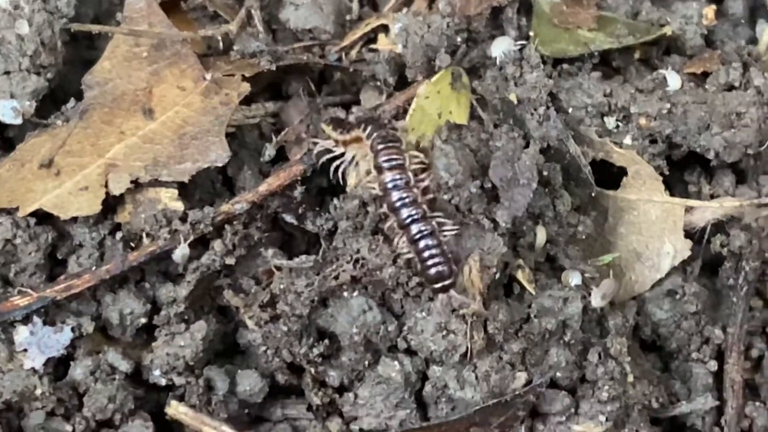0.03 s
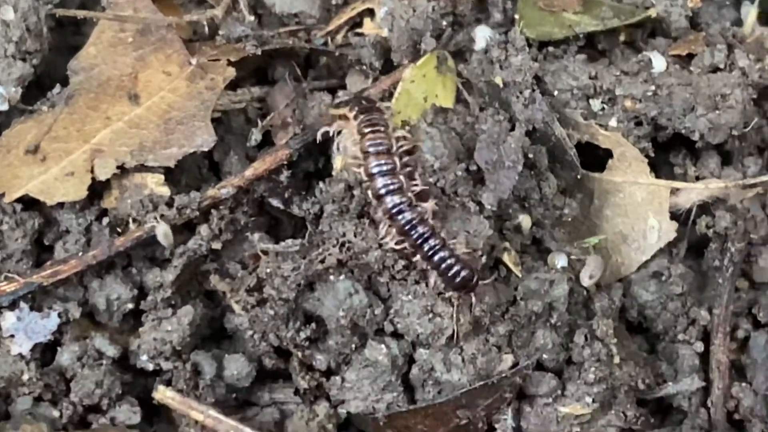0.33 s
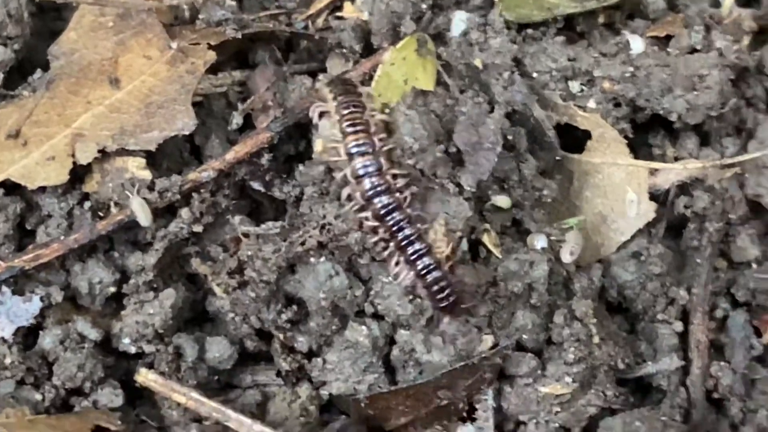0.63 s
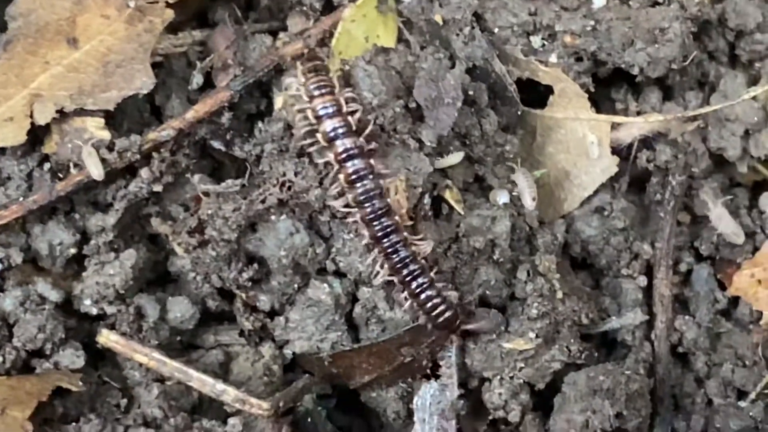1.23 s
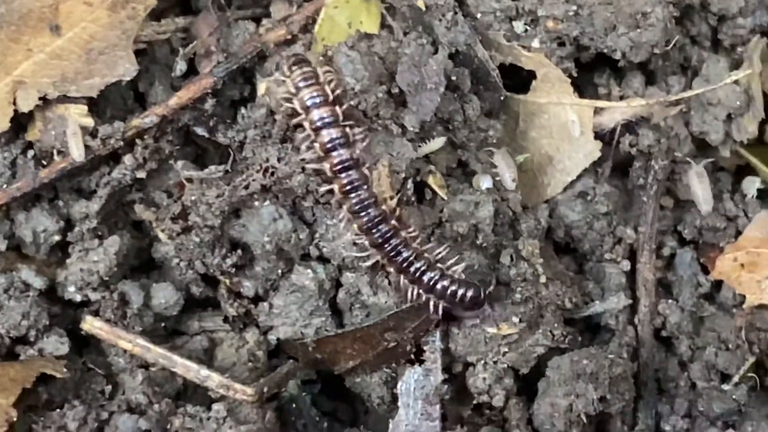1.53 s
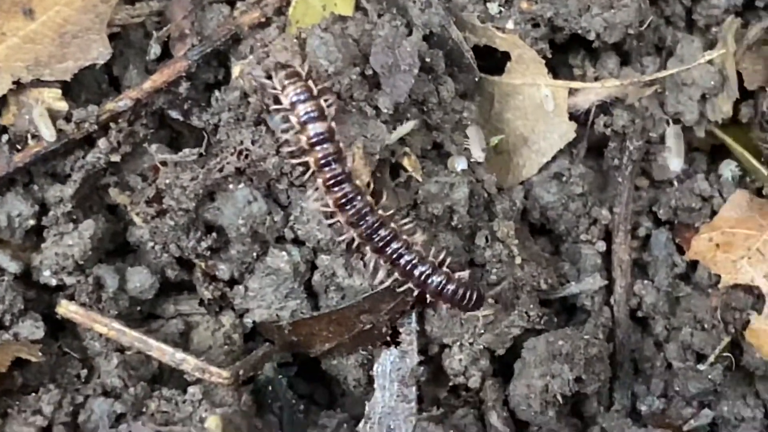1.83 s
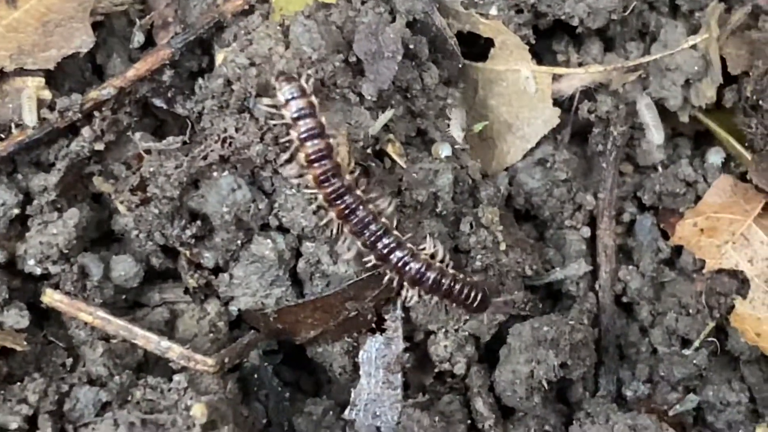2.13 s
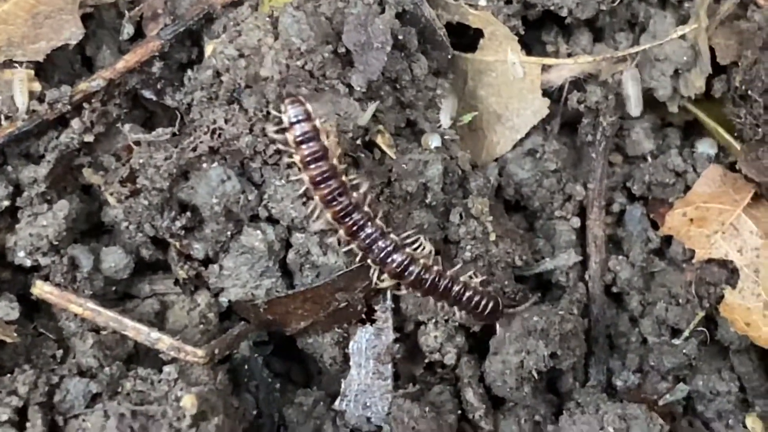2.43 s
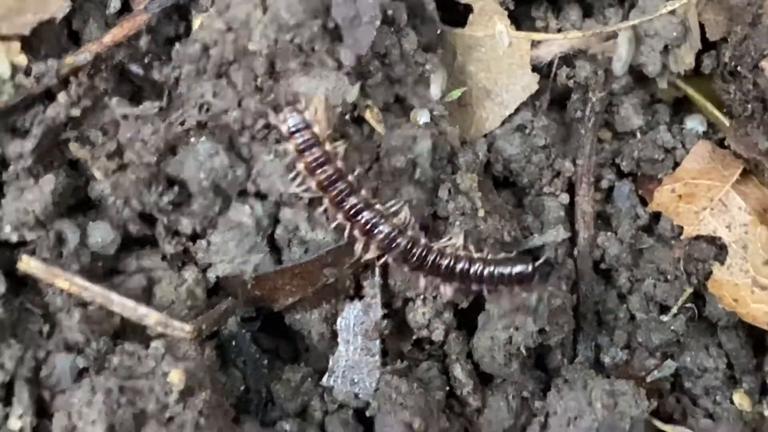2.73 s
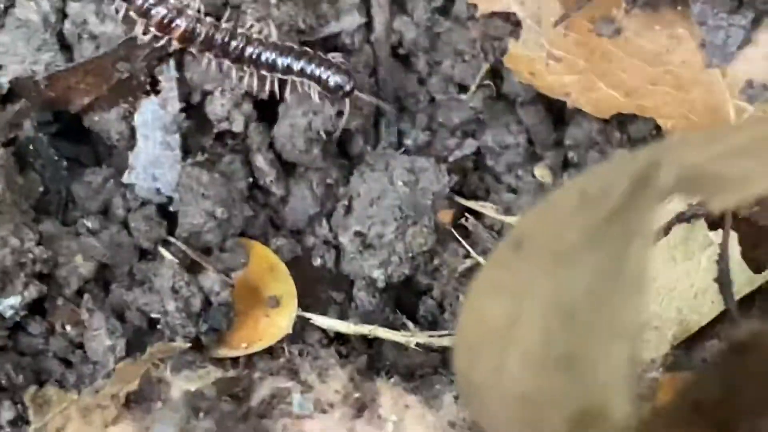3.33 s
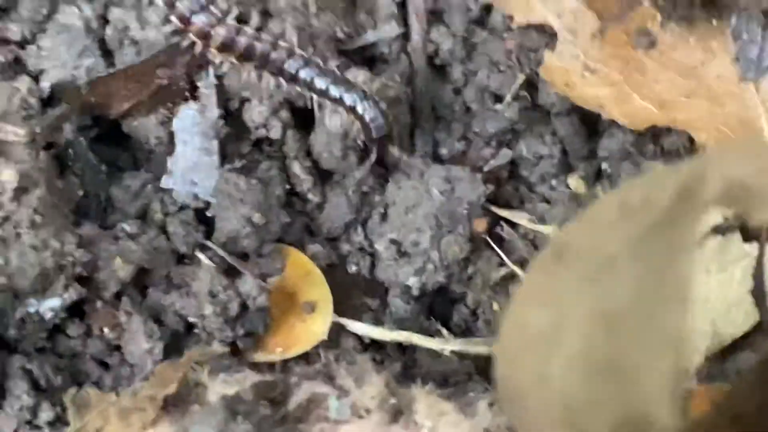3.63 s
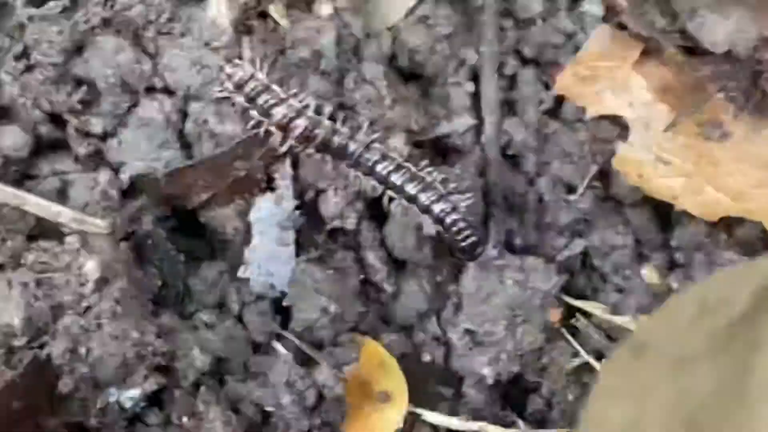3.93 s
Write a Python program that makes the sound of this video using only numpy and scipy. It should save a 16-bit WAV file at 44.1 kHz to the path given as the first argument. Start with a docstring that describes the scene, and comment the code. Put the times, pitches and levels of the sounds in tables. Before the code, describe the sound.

Dry leaves rustle and snap, with a knock and scuffs on the microphone outdoors.

```python
"""A low rumble and faint outdoor air come first, as a hand holds a camera over soil in a quiet spot.
Dry leaves tick as they fracture, and a few far-off thuds die away in short resonant tails.
Then the camera moves: leaves slide and snap, and a hard knock by the right microphone rings the case.
The shifting grip scuffs the case by friction, bumps it softly and slips with a faint squeak."""
import sys
import numpy as np
from scipy import signal
from scipy.fft import rfft, irfft, next_fast_len
from scipy.io import wavfile

SR = 44100
rng = np.random.default_rng(int(sys.argv[2]) if len(sys.argv) > 2 else 0)


def log_audio(samples):
    """Write samples as a 16-bit WAV file to the path given in sys.argv[1]."""
    # one column per channel
    frames = np.atleast_2d(samples).T
    # limit to full scale, then quantise
    limited = np.clip(frames, -1, 1)
    pcm = np.round(limited * 32767).astype(np.int16)
    wavfile.write(sys.argv[1], SR, pcm)


N = 176400
CUTOFF_HZ = 15750


def from_db(db):
    return 10 ** (np.asarray(db) / 20)


def unit_rms(x):
    return x / np.sqrt(np.mean(x ** 2) + 1e-20)


def since(onset):
    return np.maximum(np.arange(N) / SR - onset, 0)


def decay(t, t60):
    """Damping: amplitude falls exponentially, by 60 dB in t60 seconds."""
    return np.exp(-np.minimum(np.log(1000) * t / t60, 60))


def level_curve(points):
    return from_db(np.interp(since(0), *np.transpose(points)))


def at_hz(points, hz):
    frequencies, levels = np.transpose(points)
    return np.interp(np.log(hz), np.log(frequencies), levels)


def band(x, low, high):
    sos = signal.butter(2, [low, min(high, .48 * SR)], "band", fs=SR, output="sos")
    return signal.sosfilt(sos, x + 1e-18)


def drift(corner_hz, step=40):
    """Random modulation: low-passed noise wanders with unit rms."""
    pole = np.exp(-2 * np.pi * corner_hz * step / SR)
    noise = rng.standard_normal(N // step + 2002)
    slow = signal.lfilter([1], [1, -2 * pole, pole * pole], noise)[2000:]
    return np.interp(np.arange(N) / step, np.arange(len(slow)), unit_rms(slow))


def stereo(mid, side):
    return np.array([mid + side, mid - side])


def hiss():
    """Incoherent sources: two independent mid and side pairs of white noise."""
    return rng.standard_normal((2, 2, N))


def grains(per_s, spread_db, power_decay_s=0.00015):
    """Shot noise: tiny fractures of uneven size arrive at random, each a brief burst."""
    sizes = from_db(spread_db * np.minimum(rng.exponential(1, N), 4.5))
    fractures = sizes * (rng.random(N) < per_s / SR)
    power = signal.lfilter([1], [1, -np.exp(-1 / (power_decay_s * SR))], fractures ** 2 + 1e-18)
    return unit_rms(np.sqrt(power) * hiss())


# Stereo width at the two microphone ports: (frequency [Hz], side minus mid [dB])
STEREO_WIDTH = [(60, -25), (130, -12.5), (250, -8), (480, -3.5), (950, -3.5), (1600, 0.5), (2300, -9),
                (3500, -51.5), (8000, -25.5)]


def coloured(source, spectrum, flicker_db, flicker_hz):
    """Spectral shaping: third-octave bands, each with its own level, width and flicker, sum to rms 1."""
    out, edges = 0, 20 * 2 ** (np.arange(30) / 3)
    for k, (low, high) in enumerate(zip(edges, edges[1:])):
        hz = np.sqrt(low * high)
        flicker = flicker_db * drift(flicker_hz)
        if spectrum[0][0] <= hz <= spectrum[-1][0]:
            mid, side = band(source[k % 2], low, high)
            width = from_db(at_hz(STEREO_WIDTH, hz))
            out += from_db(at_hz(spectrum, hz) + flicker) * stereo(mid, side * width)
    return unit_rms(out)


# Spectrum of the hand's rumble: (frequency [Hz], relative density [dB])
RUMBLE_SPECTRUM = [(20, -6), (33, -16), (52, 2), (68, -2.5), (90, -7), (130, -12.5), (190, -24),
                   (300, -35.5), (600, -33.5)]
# Its envelope: (time [s], level [dB])
RUMBLE_ENVELOPE = [(0, -41.5), (.3, -47), (.7, -41.5), (1.0, -46), (1.35, -45), (1.85, -45), (2.1, -47),
                   (2.45, -47), (2.63, -42), (3.0, -45), (3.42, -41), (3.6, -46.5), (3.8, -39), (4, -40)]


def hand_rumble():
    """Structure-borne sound: the case conducts the low vibration of the holding hand."""
    rumble = coloured(hiss(), RUMBLE_SPECTRUM, flicker_db=2.0, flicker_hz=32)
    return level_curve(RUMBLE_ENVELOPE) * rumble


# Spectrum of the outdoor air: (frequency [Hz], relative density [dB])
AIR_SPECTRUM = [(100, 0), (230, 3), (290, -3), (400, -5), (540, -21.5), (660, -17), (1000, -15),
                (1450, -27), (1900, -22.5), (2400, -30), (3000, -27.5), (4700, -32.5), (7500, -35),
                (11000, -35), (14700, -54)]
# Faint narrow bands in it: (centre [Hz], level [dB], edge over centre [ratio])
AIR_PEAKS = [(503, -75.5, 1.04), (3084, -80, 1.126)]


def outdoor_air(level_db=-58):
    """Ambient noise: a steady broadband floor carries two faint narrow bands."""
    air = from_db(level_db) * coloured(hiss(), AIR_SPECTRUM, flicker_db=1.34, flicker_hz=6.3)
    for hz, db, span in AIR_PEAKS:
        air += from_db(db) * unit_rms(band(rng.standard_normal(N), hz / span, hz * span))
    return air


# Fractures of dry leaves: (time [s], relative level [dB], extra gain of the body [dB])
LEAF_FRACTURES = [(0.109, -40, 0), (0.6062, -29.5, -3.5), (0.8407, -41.5, 1), (1.4644, -39.5, -18),
                  (2.3313, -41.5, 10), (2.934, -22.5, -1.5), (3.011, -14.5, -5), (3.025, -25, 2),
                  (3.046, -11, -7.5), (3.0978, -15, -9), (3.111, -26.5, 10), (3.173, -24, 13),
                  (3.311, -22, -26), (3.3498, -22, -18), (3.4, -20.5, -14), (3.4527, -28, 0),
                  (3.667, -24.5, 1), (3.6985, -28, -5), (3.8493, -18.5, -5), (3.8712, -38, 21.5),
                  (3.889, -35, 12.5)]


def leaf_snaps(rise_s=0.001, t60=0.0079, edge_hz=7300, body_hz=2310, edge_db=-7, body_db=-8):
    """Brittle fracture: each break releases a noise burst with a bright edge and a papery body."""
    edge_envelope = body_envelope = 0
    for onset, db, extra_db in LEAF_FRACTURES:
        t = since(onset)
        burst = from_db(db) * (1 - np.exp(-t / rise_s)) * decay(t, t60)
        edge_envelope += burst
        body_envelope += burst * from_db(extra_db)
    edge_noise, body_noise = hiss()[0]
    edge = band(edge_envelope * edge_noise, edge_hz, CUTOFF_HZ)
    body = band(body_envelope * body_noise, body_hz / 2, body_hz * 2)
    return from_db(edge_db) * edge + from_db(body_db) * body


# Distant knocks: (time [s], level [dB])
FAR_KNOCKS = [(0.61, -55), (0.659, -68), (.75, -72), (1.725, -54)]
# Their shared resonances: (centre [Hz], gain [dB], edge over centre [ratio], t60 [s])
THUD_RESONANCES = [(526, -1, 1.102, 0.69), (914, -4, 1.26, 0.4)]


def far_thuds(rise_s=0.0048, side_db=-4):
    """Reverberant decay: distant knocks smear into short tails; the lower resonance lasts longer."""
    out = 0
    for hz, band_db, span, t60 in THUD_RESONANCES:
        tails = 0
        for onset, db in FAR_KNOCKS:
            t = since(onset)
            tails += from_db(db) * (1 - np.exp(-t / rise_s)) * decay(t, t60)
        mid, side = unit_rms(band(hiss()[0], hz / span, hz * span))
        out += from_db(band_db) * tails * stereo(mid, side * from_db(side_db))
    return out


# Spectrum of leaves sliding on each other: (frequency [Hz], relative density [dB])
RUSTLE_SPECTRUM = [(150, 12.5), (400, 10), (900, 7), (1600, -0.5), (2300, 3.5), (3200, 5), (4700, -0.5),
                   (7200, 4), (11000, 6), (16000, 3.5)]
# Vigour of the sliding: (time [s], level [dB])
RUSTLE_ENVELOPE = [(2.5, -90), (2.65, -74.5), (2.82, -60.5), (2.96, -55), (3.02, -45), (3.11, -48),
                   (3.21, -49), (3.29, -58.5), (3.39, -55), (3.44, -63), (3.52, -53), (3.58, -67.5),
                   (3.73, -64), (3.86, -63), (3.92, -62.5), (3.98, -60.5)]


def leaf_rustle(surge_db=2.5):
    """Sliding friction: dry leaves hiss and crackle against each other in small surges."""
    slide = from_db(-3) * hiss()
    crackle = from_db(-4.5) * grains(per_s=1000, spread_db=3)
    leaves = coloured(slide + crackle, RUSTLE_SPECTRUM, flicker_db=2.9, flicker_hz=31)
    surges = from_db(surge_db * drift(corner_hz=21))
    return level_curve(RUSTLE_ENVELOPE) * surges * leaves


# Strokes of the grip on the case: (time [s], duration [s], rub level [dB], rasp level [dB])
GRIP_STROKES = [(2.974, 0.0035, -43.5, -51), (3.008, 0.0033, -43, -46.5), (3.024, 0.005, -43, -51),
                (3.465, 0.0041, -44.5, -58), (3.495, .005, -53, -75), (3.753, 0.0044, -46, -46.5),
                (3.763, 0.014, -43, -49), (3.787, 0.0037, -47, -45), (3.794, 0.016, -45.5, -64),
                (3.818, 0.041, -61, -58), (3.847, 0.028, -58, -54), (3.949, 0.013, -57, -50),
                (3.963, 0.03, -51, -58.5)]
# Spectra of the dull rub and the papery rasp: (frequency [Hz], relative density [dB])
RUB_SPECTRUM = [(130, -3), (220, -3), (320, -0.5), (480, 7.5), (660, -8), (880, 0), (1400, -29),
                (2000, -36)]
RASP_SPECTRUM = [(700, 1), (1200, -1), (2100, 1.5), (2800, -2.5), (3800, -15.5), (8000, -13.5),
                 (14000, -42)]


def grip_scuffs(rise_s=0.0041, release_t60=0.032):
    """Friction noise: a dull rub and a fine rasp follow the contact pressure of each stroke."""
    rub_envelope = rasp_envelope = 0
    for onset, duration, rub_db, rasp_db in GRIP_STROKES:
        pressure = (1 - np.exp(-since(onset) / rise_s)) * decay(since(onset + duration), release_t60)
        rub_envelope += from_db(rub_db) * pressure
        rasp_envelope += from_db(rasp_db) * pressure
    grit = grains(per_s=13000, spread_db=4.5)
    rub = coloured(hiss(), RUB_SPECTRUM, flicker_db=1.0, flicker_hz=31)
    rasp = coloured(grit, RASP_SPECTRUM, flicker_db=2.0, flicker_hz=63)
    return rub_envelope * rub + rasp_envelope * rasp


# Modes of the case: (frequency [Hz], gain [dB], t60 [s], multiplier of the blow's pan [ratio])
CASE_MODES = [(61.3, -29, 0.23, 0.11), (149, -7, 0.058, 2.9), (186.5, -12.5, 0.034, 0),
              (256, -4, 0.021, 3.6), (372.5, -18, 0.033, 0.21), (619, -31, 0.066, 0.21),
              (788, -11, 0.035, 0.61), (908, -3.5, 0.013, 0.98), (1220, -13, 0.014, 2.2),
              (1374, -12.5, 0.024, 1.55), (1660, -24, 0.015, 0.81), (2110, -26.5, 0.015, 0.18),
              (3190, -28, 0.0095, 0.1), (6250, -29.5, 0.007, 0.1)]
# Blows on it: (time [s], relative level [dB], low-pass corner [Hz], rightward pan [dB])
CASE_BLOWS = [(3.124, -19.5, 586, 9), (3.172, 4, 9050, 7.5), (3.194, -1.5, 97, 1),
              (3.469, -24.5, 470, -1.5), (3.477, 3.5, 61.6, 0), (3.5, -15, 170, 1.5), (3.767, -9, 239, 2.5),
              (3.771, 1, 52, 2), (3.784, -12.5, 100, -3), (3.796, -13.5, 260, 3), (3.934, -8, 49.8, 0.5),
              (3.966, -12.5, 283, 1.5)]


def case_blows(build_cycles=0.47, max_lag_s=0.00048):
    """Modal ringing: blows excite damped modes; low ones build last, soft contacts lose the highs."""
    out, size = np.zeros((2, N + SR)), SR // 3
    t = np.arange(size) / SR
    left_only = np.array([[1], [0]])
    for onset, db, corner_hz, pan_db in CASE_BLOWS:
        start = int(onset * SR)
        for k, (hz, mode_db, t60, pan_scale) in enumerate(CASE_MODES):
            # A blow on the right reaches the left port later and weaker.
            lag = max_lag_s * np.tanh(pan_db / 6) * (pan_scale > .1)
            age = np.maximum(t - lag * left_only, 0)
            gain = from_db(db + mode_db - pan_db * pan_scale * left_only) / (1 + (hz / corner_hz) ** 2)
            build = 1 - np.exp(-(age * hz / build_cycles) ** 2)
            ring = decay(age, t60) * np.sin(2 * np.pi * hz * age)
            out[:, start:start + size] += (-1) ** k * gain * build * ring
    return out[:, :N]


def grip_squeak(peak_s=3.585, swell_s=0.097, hz=2280, half_width_hz=70, level_db=-69):
    """Narrow-band friction noise: a thin note swells and fades as the grip slips."""
    swell = np.exp(-((since(0) - peak_s) / swell_s) ** 2)
    note = unit_rms(band(rng.standard_normal(N), hz - half_width_hz, hz + half_width_hz))
    return from_db(level_db) * swell * note


def scene():
    """Superposition: the pressures of all the sources add."""
    return (hand_rumble() + outdoor_air() + leaf_snaps() + far_thuds()
            + leaf_rustle() + grip_scuffs() + case_blows() + grip_squeak())


# Treble roll-off of both microphones: (frequency [Hz], gain [dB])
MIC_ROLLOFF = [(11500, 0.5), (13000, -6.5), (14200, -10.5), (16000, -17)]
# Phase lag of the right microphone: (frequency [Hz], lag [cycles])
RIGHT_PHASE_LAG = [(7400, 0), (9050, .5), (11200, 1), (13250, 1.5), (15000, 2)]


def record(dry, low_cut_hz=38):
    """Frequency response: the microphones lose deep bass and top octave; the right lags in the treble."""
    size = next_fast_len(N + SR // 4)
    hz = np.arange(size // 2 + 1) * SR / size
    left, right = rfft(dry, size) * from_db(np.interp(hz, *np.transpose(MIC_ROLLOFF)))
    right *= np.exp(-2j * np.pi * np.interp(hz, *np.transpose(RIGHT_PHASE_LAG)))
    heard = irfft(np.array([left, right]), size)[:, :N]
    heard = signal.sosfilt(signal.butter(2, low_cut_hz, "high", fs=SR, output="sos"), heard)
    return signal.sosfilt(signal.ellip(10, .2, 80, CUTOFF_HZ, fs=SR, output="sos"), heard)


dry = scene()
out = record(dry)
log_audio(out)
```